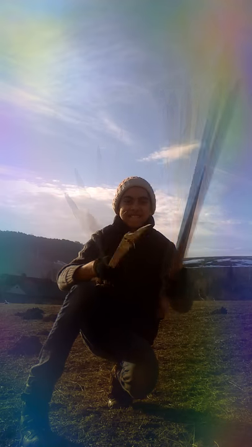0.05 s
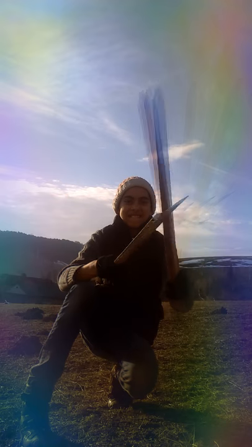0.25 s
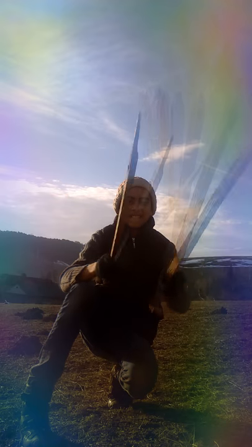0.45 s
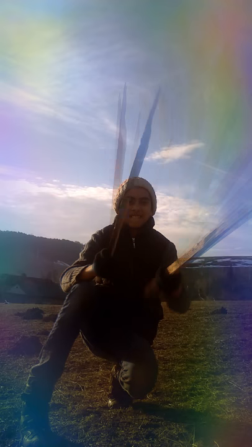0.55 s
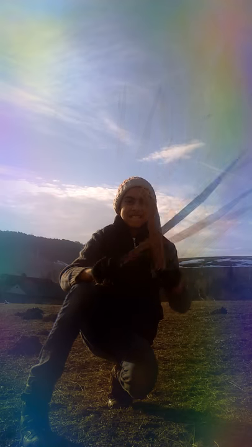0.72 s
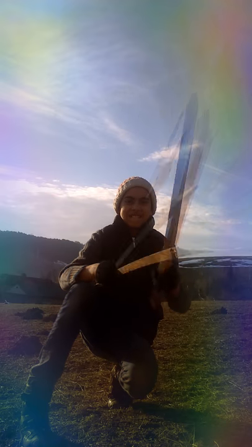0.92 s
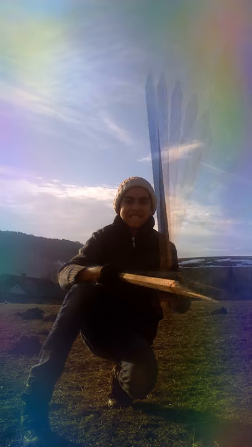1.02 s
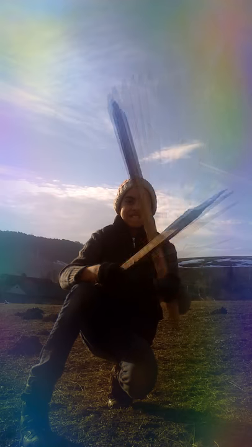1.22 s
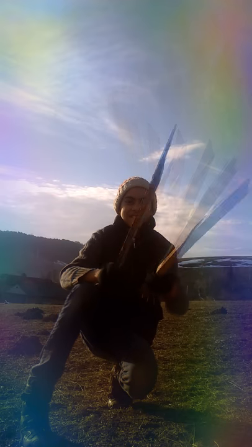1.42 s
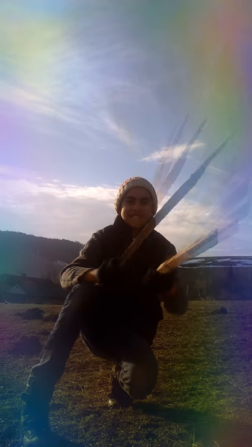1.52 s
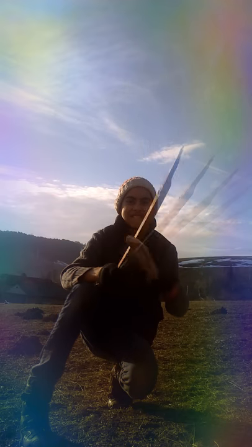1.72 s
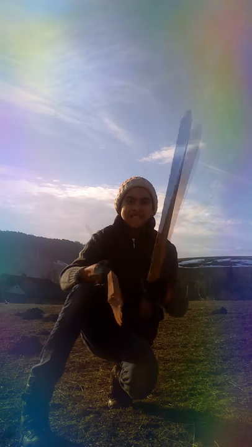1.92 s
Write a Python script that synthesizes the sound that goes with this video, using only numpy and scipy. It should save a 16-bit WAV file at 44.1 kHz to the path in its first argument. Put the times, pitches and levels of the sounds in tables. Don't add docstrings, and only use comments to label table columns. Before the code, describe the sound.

Two wooden sticks strike close to a stereo microphone on open grass. A loud, bright crack lands at 0.23 s, briefly ducking the sound, then lighter hollow knocks at 0.41 and 0.77. A small tick at 1.23 precedes a knock at 1.27, rattling and scraping until 1.43. A last clack comes at 1.69. Tails are very short; faint hiss, soft wind puffs and a slowly falling distant propeller drone continue underneath.

```python
import sys
import numpy as np
from scipy import signal
from scipy.fft import rfft, irfft, next_fast_len
from scipy.io import wavfile
from scipy.ndimage import map_coordinates

SR = 44100
rng = np.random.default_rng(int(sys.argv[2]) if len(sys.argv) > 2 else 0)


def log_audio(samples):
    frames = np.atleast_2d(samples).T
    limited = np.clip(frames, -1, 1)
    pcm = np.round(limited * 32767).astype(np.int16)
    wavfile.write(sys.argv[1], SR, pcm)


def how_loud(loudness_db):
    steps = np.asarray(loudness_db, float) / 20
    return 10 ** steps


N = 85995

# [freq_hz, level_db]
AIR_LEFT = [(20, 3.5), (200, 6.5), (500, -0.5), (1500, -4), (2800, -1), (4500, -4.5), (13000, -6),
            (16000, -10.5)]
AIR_RIGHT = [(20, 4.5), (200, 8.5), (700, 2), (1500, -0.5), (2800, 1), (4500, -4.5), (10000, -12.5),
             (16000, -9.5)]
# [freq_hz, likeness -1..1]
AIR_ALIKE = [(50, 0.03), (300, -0.402), (3000, -.3), (5000, -0.48)]
# [time_s, level_db]
AIR_LEVEL = [(0, -65), (.7, -66.5), (1.95, -67.5)]
# [centre_s, width_s, level_db]
PUFFS = [
    (.02, 0.011, -66.5),
    (.078, 0.01, -59),
    (.222, 0.0093, -53),
    (.99, 0.012, -70),
    (1.945, .015, -69),
]
# [freq_hz, level_db]
WIND_COLOUR = [(15, -13), (70, 2), (120, -5), (300, -24.5), (800, -59)]
# [time_s, pitch_hz, level_db]
ENGINE_PATH = [(0, 42.5, -52), (.5, 41.1, -54), (1.0, 39.7, -56), (1.4, 38.2, -58), (1.95, 37.6, -56)]
ORDERS_DB = [-9, 0, -12, -9, -24, -28]
# [freq_hz, level_db]
RUMBLE_COLOUR = [(15, -9), (50, -1.5), (100, 8.5), (200, -5.5), (350, -22), (600, -33), (1500, -60.5)]
# [freq_hz, t60_s]
NEAR_DECAY = [(500, .035), (2200, 0.029), (5000, .035), (12000, 0.027)]
# [freq_hz, t60_s]
FIELD_DECAY = [(500, .06), (2200, .12), (5000, .06), (12000, .03)]
# [freq_hz, level_db]
HISS_COLOUR = [(2200, -47), (4500, -10), (8000, -7), (13000, -3), (16000, -18)]
# [start_s, rise_s, t60_s, body_db, hiss_db]
TICKS = [
    (1.2256, .0002, .007, -47, -52),
    (1.2812, .0003, .012, -52, -51),
]
RATTLE = [(1.272, .002, 0.057, -45, -57), (1.2915, .0005, .03, -48, -58), (1.303, 0.00092, 0.026, -61, -70),
          (1.309, .0005, 0.016, -60, -60), (1.314, .001, .02, -57, -71), (1.325, .001, 0.049, -57.5, -67),
          (1.333, .002, 0.017, -62, -66)]
SLIDE_UP = [(1.3835, .0015, 0.038, -52.5, -51), (1.387, 0.0009, 0.035, -48.5, -59),
            (1.392, 0.0016, 0.022, -48, -58), (1.395, .001, 0.019, -50, -56)]
SLIDE_BACK = [(1.4048, .0006, 0.028, -45, -56), (1.4075, 0.00164, .018, -43, -37.5),
              (1.412, 0.0014, .02, -51, -46.5), (1.417, .002, 0.012, -49, -62)]
# [freq_hz, width_hz, level_db]
TICK_BODY = [(3230, 1200, 1.5), (6310, 1020, -2.5), (9000, 2000, -9)]
RATTLE_BODY = [(1200, 540, -9.5), (1930, 190, 0), (2470, 200, -3), (3080, 250, -1.5), (4060, 1300, -11.5)]
UP_BODY = [(900, 114, -13.5), (1296, 83, -9.5), (2460, 120, -1), (3220, 160, -5.5), (4020, 110, -13.5),
           (5100, 120, -17)]
BACK_BODY = [(1350, 140, -9), (1930, 210, 1.5), (2950, 130, -4), (3730, 130, -6.5), (4620, 95, -11),
             (5700, 160, -12.5)]
# [start_s, ring_db, crack_db, bounce_db, bounce_delay_s]
BLOWS = [
    (.2279, -2, -38, -13, .0019),
    (.4095, -24, -40, -8, .0011),
    (.7693, -20, -34, -6, .0012),
    (1.2655, -17, -40, -8, .004),
    (1.6893, -14, -38, -4, .0042),
]
# [snap_db, bounce_snap_db, attack_s]
CONTACTS = [(-55, -32, 0.0002), (-58, -46, 0.00017), (-32, -52, 0.00015), (-41.5, -41, 0.000177),
            (-56, -34, .0005)]
# [pitch_hz, left_db, right_db, t60_s]
RING_1 = [(505, -33, -40.5, 0.024), (754, -26, -30, 0.013), (980, -25.5, -27.5, 0.022),
          (1200, -23, -27, .02), (1530, -21, -8.5, 0.0075), (2062, -1, -2, 0.015), (2613, -0.5, -7, 0.014),
          (3134, -1, -3, 0.012), (3420, -11, -13, 0.014), (3960, -13, -16, 0.016), (4330, -19, -19, 0.018),
          (4580, -28.5, -23, 0.019), (5810, -31.5, -36, .013), (7870, -39, -35.5, 0.0055)]
RING_2 = [(807, 3.5, -0.5, 0.024), (1010, 2.0, 3.5, 0.01), (1810, 5.5, 2.5, 0.011), (2910, 7.5, -5.0, 0.01),
          (4095, -6.5, -19, 0.025), (4860, -11.0, -31, 0.024), (5160, -37, -26, 0.011),
          (5870, -15.5, -17, 0.016), (7100, -35, -18, 0.0071), (7730, -8.0, -10.5, 0.011),
          (1395, 2.0, 9.0, 0.012), (450, -10, -9, 0.03), (2600, -5.5, -15.5, 0.013)]
RING_3 = [(834, 0.5, 3.0, 0.013), (1950, -9.5, -9.5, 0.025), (2140, -19, -14, 0.044),
          (2740, -10.5, -38, 0.018), (3390, -11.5, -23, 0.016), (4294, -5.5, -10.5, 0.012),
          (5000, -7.5, -39, 0.0069), (5360, -15, -32, 0.011), (6800, -38, -26.5, 0.011),
          (8670, -17, -10, 0.0029), (1257, -14.5, -36, 0.026), (415, -26, -25, .02)]
RING_4 = [(592, -17.5, -15, 0.039), (882, -10.5, -9.5, 0.046), (1410, -9.5, -18, 0.028),
          (1583, -0.5, 2.0, 0.0092), (2750, -10, -26, 0.0088), (2894, -15.5, -15, 0.036),
          (3320, -7, -8.0, 0.011), (4014, -28, -31, 0.017), (6097, -23.5, -25.5, 0.038),
          (6880, -28, -25, 0.0052), (450, -20.0, -30.0, 0.026)]
RING_5 = [(1033, 10, 2.0, 0.013), (1292, -5.5, 0, 0.019), (1696, -6.5, -7, 0.021), (2176, 1, 4.5, 0.0093),
          (2680, -16, 4.0, 0.005), (3085, -8, -7.5, 0.013), (3437, -6, -9.5, 0.017),
          (3810, -16, -7.0, 0.0079), (4176, -10.5, -12, 0.022), (4840, -9.5, -39.5, 0.016),
          (5440, -23.5, -23, 0.018), (182.7, -28.5, -48, 0.27), (774, -15.0, -2, 0.0074),
          (6060, -21.5, -26, 0.023)]
# [freq_hz, level_db]
CRACK_LEFT = [(200, -39), (500, 8), (1500, 6.5), (5000, -1.5), (8000, -3), (13000, 0), (16000, -16.5)]
CRACK_RIGHT = [(200, -35.5), (500, 9.5), (1500, 5.5), (5000, -2.5), (8000, -7.5), (13000, -14.5),
               (16000, -18)]
# [freq_hz, lead_rad]
PORT_LEAD = [(1050, -2.7), (1350, -.6), (2100, -.9), (3200, -1.1), (4200, 1), (5500, -1.7), (7700, .5)]


def unit(x):
    return x / np.sqrt(np.mean(x ** 2) + 1e-20)


def along(points, hz):
    f, v = np.transpose(points)
    return np.interp(np.log(hz + 1), np.log(f + 1), v)


def wobble(rate, count=N):
    knots = rng.standard_normal(int(count * rate / SR) + 4)
    return map_coordinates(knots, [np.arange(count) * rate / SR])


def filtered(x, response):
    m = next_fast_len(N + 8192)
    return irfft(rfft(x, m) * response(np.fft.rfftfreq(m, 1 / SR)), m)[..., :N]


def noise(*colours):
    white = rng.standard_normal((len(colours), N))
    return unit(filtered(white, lambda hz: how_loud([along(c, hz) for c in colours])))


def air():
    left, other = rng.standard_normal((2, N))

    def alike(hz):
        return np.clip(along(AIR_ALIKE, hz), -1, 1)

    right = filtered(left, alike) + filtered(other, lambda hz: np.sqrt(1 - alike(hz) ** 2))
    pair = filtered(np.array([left, right]), lambda hz: how_loud([along(AIR_LEFT, hz), along(AIR_RIGHT, hz)]))
    s, db = np.transpose(AIR_LEVEL)
    level_db = np.interp(np.arange(N) / SR, s, db) + 0.599 * wobble(11)
    return how_loud(level_db) * unit(pair)


def wind():
    breeze_db, lump_db = -77.5, 2.5
    t = np.arange(N) / SR
    breeze = how_loud(breeze_db + lump_db * wobble(25))
    puffs = sum(how_loud(db) * np.exp(-((t - s) / width) ** 2) for s, width, db in PUFFS)
    return (breeze + puffs) * noise(WIND_COLOUR, WIND_COLOUR)


def engine():
    waver_db, right_db, rumble_db = 1.5, -.6, -64
    s, hz, db = np.transpose(ENGINE_PATH)
    t = np.arange(N) / SR
    pitch_hz = np.interp(t, s, hz) * (1 + 0.012 * wobble(4.2))
    turn = 2 * np.pi * np.cumsum(pitch_hz) / SR
    shared_db = waver_db * wobble(6)
    orders = np.zeros(N)
    for order, order_db in enumerate(ORDERS_DB, 1):
        orders += how_loud(order_db + shared_db + waver_db * wobble(7.8)) * np.sin(order * turn)
    drone = how_loud(np.interp(t, s, db)) * orders + how_loud(rumble_db) * noise(RUMBLE_COLOUR)[0]
    return drone * [[1], [-how_loud(right_db)]]


def scatter(x, decay):
    smear_per_s, flutter_db = 900, 2
    hz, t, z = signal.stft(rng.standard_normal((2, SR // 4)), SR, nperseg=128)
    fade = how_loud(-60 * t / along(decay, hz)[:, None])
    tail = signal.istft(z * fade, SR, nperseg=128)[1]
    tail = tail / np.linalg.norm(tail[0])
    wet = signal.fftconvolve(x * wobble(smear_per_s), tail, axes=1)[:, :N]
    return wet * how_loud(flutter_db * wobble(200))


def wood_hiss():
    return how_loud([[1], [-10.5]]) * noise(HISS_COLOUR, HISS_COLOUR)


def wood_body(hz, peaks):
    total = 0
    for k, (centre, width, db) in enumerate(peaks):
        band = 1j * hz * width
        total = total + (-1) ** k * how_loud(db) * band / (centre ** 2 - hz ** 2 + band)
    return total


def slides():
    grain_db = 1
    t, out = np.arange(N) / SR, np.zeros((2, N))
    groups = [(TICKS, TICK_BODY), (RATTLE, RATTLE_BODY), (SLIDE_UP, UP_BODY), (SLIDE_BACK, BACK_BODY)]
    for rows, peaks in groups:
        stroke = np.zeros((2, N))
        for s, rise, t60, body_db, hiss_db in rows:
            fade_db = -60 * np.clip(t - s - rise, 0, None) / t60
            stroke += np.clip((t - s) / rise, 0, 1) ** 2 * how_loud([[body_db], [hiss_db]] + fade_db)
        stroke *= how_loud(grain_db * wobble(650))
        white = rng.standard_normal((2, N))
        loudness = np.std(filtered(white, lambda hz: wood_body(hz, peaks)))
        out += filtered(stroke[0] * white, lambda hz: wood_body(hz, peaks)) / loudness
        out += stroke[1] * wood_hiss()
    return out


def ringing(modes, since, t):
    rough_db = 1.8
    ring = np.zeros(t.shape)
    for hz, left_db, right_db, t60 in modes:
        level_db = [[left_db], [right_db]] - 60 * t / t60 + rough_db * wobble(400, count=SR // 4)
        phase = along(PORT_LEAD, hz) * np.array([[0], [-1]])
        ring += how_loud(level_db) * np.sin(2 * np.pi * hz * since + phase)
    return ring


def blows():
    crack_t60, snap_t60, bounce_snap_t60 = .018, .006, .027
    right_late_s, bass_cut_hz = .0003, 300
    out, crack, snap = np.zeros((2, N)), noise(CRACK_LEFT, CRACK_RIGHT), wood_hiss()
    rings = [RING_1, RING_2, RING_3, RING_4, RING_5]
    for blow, contact, modes in zip(BLOWS, CONTACTS, rings):
        s, ring_db, crack_db, bounce_db, delay = blow
        snap_db, bounce_snap_db, attack = contact
        span = slice(int(s * SR), int(s * SR) + SR // 4)
        direct = (s, 0, snap_db, snap_t60)
        bounce = (s + delay, bounce_db, bounce_snap_db, bounce_snap_t60)
        for start, db, bright_db, bright_t60 in [direct, bounce]:
            since = np.arange(N)[span] / SR - start
            t = np.clip(since - np.array([[0], [right_late_s]]), 0, None)
            hit = how_loud(ring_db) * ringing(modes, since, t)
            hit += how_loud(crack_db - 60 * t / crack_t60) * crack[:, span]
            hit += how_loud(bright_db - 60 * t / bright_t60) * snap[:, span]
            out[:, span] += how_loud(db) * (1 - np.exp(-t / attack)) ** 2 * hit
    mid = out.mean(0)
    return out - mid + filtered(mid, lambda hz: (1j * hz / (bass_cut_hz + 1j * hz)) ** 2)


def scene():
    near_db, field_db = -16, -30.5
    sticks = blows() + slides()
    tails = how_loud(near_db) * scatter(sticks, NEAR_DECAY) + how_loud(field_db) * scatter(sticks, FIELD_DECAY)
    return sticks + tails + engine() + air() + wind()


def low_pass(x):
    return signal.sosfilt(signal.butter(12, 16600, fs=SR, output="sos"), x)


def record(dry):
    top_hz, offset = 16550, .0007
    duck_s, duck_db, duck_in_s, recover_s = .2325, -10, .003, .035
    t = np.clip(np.arange(N) / SR - duck_s, 0, None)
    gain = how_loud(duck_db * (1 - np.exp(-t / duck_in_s)) * np.exp(-t / recover_s))
    wet = filtered(dry, lambda hz: hz < top_hz) + offset
    return low_pass(gain * wet)


dry = scene()
out = record(dry)
log_audio(out)
```